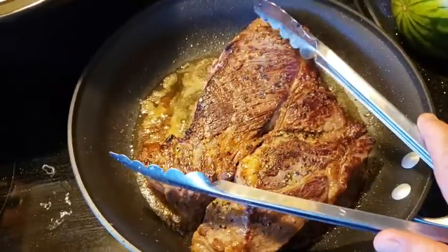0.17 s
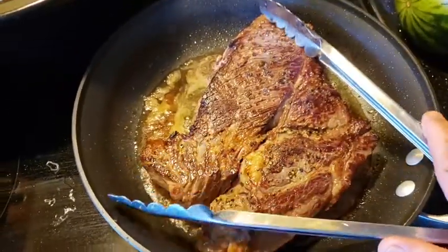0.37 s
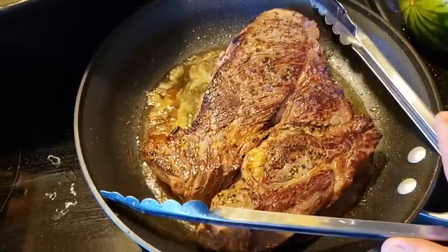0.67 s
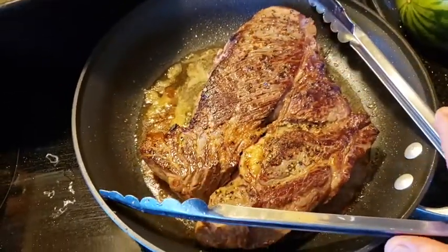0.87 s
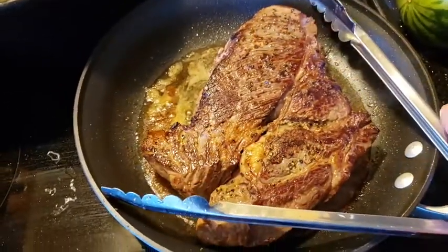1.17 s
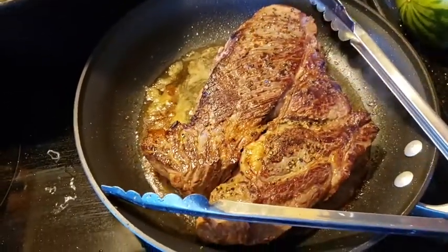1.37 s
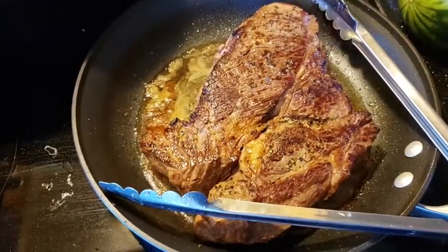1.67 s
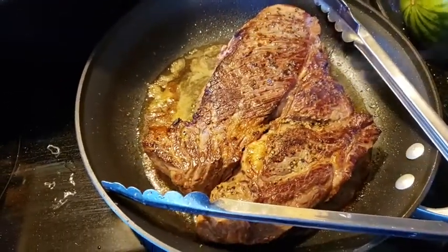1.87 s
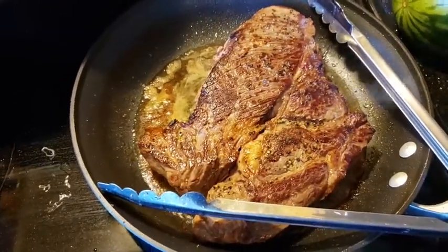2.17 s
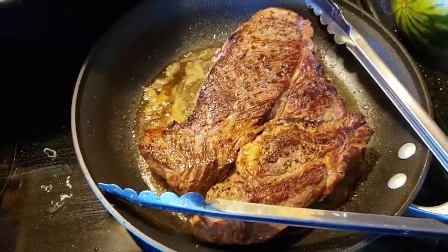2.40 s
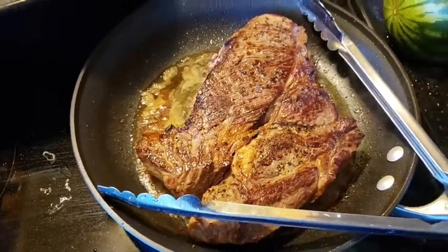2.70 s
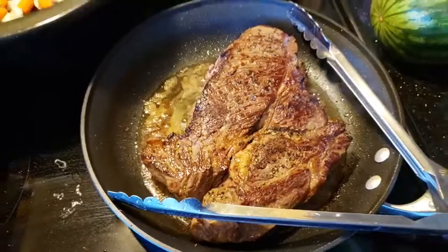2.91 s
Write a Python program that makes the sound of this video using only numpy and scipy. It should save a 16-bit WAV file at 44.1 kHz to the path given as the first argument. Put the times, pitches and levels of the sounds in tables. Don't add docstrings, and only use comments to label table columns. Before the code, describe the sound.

Meat sizzles steadily in hot fat in a pan, with sharp spits and a light tong clink

```python
import sys
import numpy as np
from scipy import signal
from scipy.io import wavfile

SR = 44100
rng = np.random.default_rng(int(sys.argv[2]) if len(sys.argv) > 2 else 0)


def digitize_waveform(pressure):
    field = np.atleast_2d(pressure).T
    bounded = np.clip(field, -1, 1)
    quanta = np.round(bounded * 32767).astype(np.int16)
    wavfile.write(sys.argv[1], SR, quanta)


def rack_gain(trim_db):
    fader = np.asarray(trim_db, float)
    return 10 ** (fader / 20)


N = 134505

# time_s, fizz_db (under the meat), spit_db (at the surface),
# brightness_db_per_octave, left_right_db
FRYING_HEAT = [(0, -30, -35, -5, -0.5), (.2, -31, -39.5, 0, -1), (.4, -31, -36, -5, -0.5),
               (.6, -31, -37.5, 1, -1), (.8, -30, -40, -1, -0.5), (1.0, -31, -36.5, 1.5, 0),
               (1.2, -31, -34, -1, -0.5), (1.33, -31, -34, 4, 0), (1.47, -30.5, -34.5, 3.5, -1),
               (1.6, -28, -35, 3, -2), (1.8, -29, -35.5, 5, -1), (2.0, -29, -35, -1, -1.5),
               (2.35, -29.5, -33.5, 3, -2), (2.55, -28.5, -36, 0.5, -2), (2.7, -29, -38, 0.5, -1),
               (2.87, -29.5, -39.5, -2.5, -2.5), (3.05, -30.5, -37, -4.5, -3)]
# pitch_hz, level_db_per_hz
FIZZ_COLOUR = [(1000, -24), (1400, -13), (2200, -0.5), (2800, -0.5), (3700, -9.5), (5300, -1), (6800, -6.5),
               (8500, -18)]
SPIT_COLOUR = [(7500, -3.5), (12000, 5), (15700, -4)]
TICK_COLOUR = [(2500, -10), (6000, -3.5), (13500, 3.5)]
STEAM_COLOUR = [(410, -93), (700, -31), (886, -10), (1440, 1.5), (2630, 7), (6070, -0.5), (8760, -1.5),
                (14800, 0), (16000, -12)]
# pitch_hz, level_db_per_hz
HUM_COLOUR = [(82, -35), (140, -15), (194, 9.5), (210, -20), (270, -37), (1100, 3), (1430, -35),
              (2420, -120)]
AIR_COLOUR = [(18, -34), (30, 7), (65, 2), (124, -1), (220, -13), (290, -50), (480, -120)]
# pitch_hz, likeness (1 same, 0 unrelated, -1 opposite)
PORT_LIKENESS = [(60, 0.3), (130, 0.44), (290, 0.98), (640, 1), (1410, 0.49), (3100, -0.39), (6820, 0.074),
                 (15000, 0.035)]
# middle_s, peak_db, pitch_hz
AIR_PUFFS = [(0.018, -33, 55), (.19, -32, 65), (.285, -23.5, 54.7), (.24, -40, 130), (.85, -39.5, 70),
             (1.16, -37, 62), (1.46, -41, 50), (1.56, -35, 60.4), (1.84, -36, 70), (1.9, -38, 60),
             (2.4, -40, 60), (2.695, -29, 70), (2.74, -34.5, 141), (2.91, -32.5, 75), (3.02, -33.5, 65)]
# start_s, peak_db, softness_db_per_octave
WORKTOP_KNOCKS = [
    (.0251, -26, -13),
    (.0335, -29, 0),
    (1.677, -33, -2),
    (2.055, -25, -3),
    (2.064, -30, -2),
    (2.907, -35, -9),
    (1.5405, -12, .1),
    (1.5435, -18, -3.5),
]
# pitch_hz, level_db, t60_s
WORKTOP_MODES = [(130, -12.5, 0.051), (285, -18, 0.071), (431, -21.5, 0.013), (609, -7.5, 0.017),
                 (776, -7.5, 0.017), (1056, -8.5, 0.019), (1220, -10, 0.02), (1490, -8, 0.023),
                 (1830, -9, 0.017), (2300, -29, 0.012), (3580, -40, .01)]
# start_s, peak_db, pitch_hz, left_right_db
DROPLET_SNAPS = [(.0252, -6, 7500, 2), (.0268, -14, 11500, 0), (.0314, -13, 12000, 0),
                 (.0323, -10, 6000, -1), (.0334, -6, 7000, 0), (.0336, -2.5, 13000, -1),
                 (.0347, -10, 13500, -1), (.036, -12, 7500, 0), (.0477, -16, 12000, -1),
                 (.0491, -12, 12700, -2), (.052, -16, 12500, 0), (.6234, -10, 12000, -2),
                 (.6305, -17, 11000, 0), (.6325, -12, 13000, -1), (.635, -17, 12000, -2),
                 (.638, -19, 13000, 0), (.868, -17, 9000, 0), (.875, -14, 9500, 0), (.966, -18, 12400, 2),
                 (1.261, -17, 15000, 2), (1.4428, -10, 12000, 6), (1.4481, -2, 14000, 5),
                 (1.455, -15, 14500, 2), (2.9074, -15, 5000, -2), (2.967, -18, 13900, -4)]
# start_s, peak_db, pitch_hz, left_right_db
BIG_POPS = [(0.519, -25, 2100, 4), (0.9817, -22, 3080, 1.0), (0.9953, -20, 2330, 1.5),
            (1.5047, -19, 2650, 5), (1.6225, -25, 2780, 1.0), (1.7242, -25, 2320, 12),
            (1.807, -17.5, 2570, 3.5), (1.836, -23, 2240, 0), (1.87, -25.5, 1880, -1),
            (1.9015, -21, 2740, -0.5), (2.0514, -23, 2890, -1.0), (2.119, -22, 2090, -12),
            (2.3747, -19, 2400, -9), (2.4095, -20, 2580, -7), (2.467, -23, 2280, -14),
            (2.5441, -19.5, 2950, 3.5), (2.5524, -17, 3030, 2), (2.6654, -16.5, 2460, -2.5),
            (2.692, -19.5, 2350, -8), (2.7459, -24, 2100, -7), (2.8382, -15.5, 2730, -8),
            (2.8848, -17.5, 2140, -18), (2.907, -16.5, 2730, -11), (2.9117, -15.5, 2360, -2),
            (2.9375, -24, 2370, -2.0), (2.9672, -21.5, 2460, 1), (3.0103, -19, 2830, 1)]
SMALL_POPS = [(0.2239, -18.5, 5400, 1.0), (0.523, -21, 4050, -1), (0.663, -14.5, 5910, -2),
              (0.856, -14, 7410, 5), (1.2014, -14.5, 5050, -1), (1.5429, -18, 6470, 1),
              (1.7399, -16, 5780, 1), (1.9085, -19, 5130, 6.0), (2.0427, -17, 6340, -1),
              (2.5745, -32, 5480, 1), (2.575, -15, 5080, -6), (2.6319, -15, 5670, -2),
              (2.7364, -17, 5970, 4.5)]
# start_s, peak_db, softness_db_per_octave
TONG_TOUCHES = [
    (.3656, -17, 2),
    (.3667, -14, 3.5),
    (.3693, -19, 2.5),
    (.3745, -14.5, 2.5),
    (.3795, -19, 4),
    (.384, -22, 2),
    (.389, -24.5, 6),
    (.394, -26, 3),
    (.402, -24, 4),
]
# pitch_hz, level_db, t60_s
TONG_MODES = [(118.6, -12.5, 0.077), (290, -25, 0.11), (587, -17.5, 0.038), (1155, -9.5, 0.029),
              (1408, -6.5, 0.046), (1546, -8, 0.031), (2040, -9.5, 0.035), (2650, -7.5, 0.033),
              (3200, -6, 0.028), (3950, -7, 0.016), (4710, 0, 0.022), (5440, -2, 0.025), (7190, -1, 0.014),
              (9200, -4.5, 0.011)]
# time_s, level_db
RIM_SLIDE = [
    (.59, -75),
    (.61, -42),
    (.635, -41.5),
    (.652, -37.5),
    (.67, -45),
    (.7, -55),
    (.72, -79),
]
# pitch_hz, width_hz, share
LEFT_PORT = [(5790, 5360, 0.76), (9340, 3900, -0.36)]


def rms_one(x):
    return x / np.sqrt(np.mean(x ** 2) + 1e-20)


def in_time(rows):
    times_s, *columns = np.transpose(rows)
    return [np.interp(np.arange(N) / SR, times_s, column) for column in columns]


def at_hz(colour, hz):
    points_hz, values = np.transpose(colour)
    return np.interp(np.log(hz), np.log(points_hz), values)


def drift(rate_hz):
    pull = np.exp(-80 * np.pi * rate_hz / SR)
    warm_up = 2000
    noise = rng.standard_normal(N // 40 + 2 + warm_up)
    slow = rms_one(signal.lfilter([1], [1, -2 * pull, pull * pull], noise)[warm_up:])
    return np.interp(np.arange(N) / 40, np.arange(len(slow)), slow)


def ring(clicks, hz, t60_s):
    decay = rack_gain(-60 / (t60_s * SR))
    turn = 2 * np.pi * min(hz, .45 * SR) / SR
    return signal.lfilter([0, np.sin(turn)], [1, -2 * decay * np.cos(turn), decay * decay], clicks + 1e-18)


def at_ports(start_s, size, lag_s, pan_db):
    out = np.zeros((2, N + 64))
    arrivals = (start_s * SR + 0 * lag_s, (start_s + lag_s) * SR)
    gains = (rack_gain(pan_db / 2), rack_gain(-pan_db / 2))
    for port, arrival, gain in zip(out, arrivals, gains):
        i = np.clip(arrival, 0, N).astype(int)
        part = arrival % 1
        np.add.at(port, i, size * gain * (1 - part))
        np.add.at(port, i + 1, size * gain * part)
    return out[:, :N]


def bursts(colour, per_s, cycles, spread_db, clump_db, tilt_db=0, count=18):
    out = 0
    shared_clumps = clump_db * drift(22)
    for hz in np.geomspace(colour[0][0], colour[-1][0], count):
        chance = per_s / count / SR * rack_gain(shared_clumps + clump_db * drift(20))
        start_s = np.flatnonzero(rng.random(N) < chance) / SR
        push, lag, pan = rng.standard_normal((3, len(start_s)))
        bigness = np.minimum(rng.exponential(1, len(start_s)), 2.8)
        size = rack_gain(spread_db * bigness) * np.sign(push)
        clicks = at_ports(start_s, size, lag_s=.00013 + .00008 * lag, pan_db=7.5 * pan)
        band = rms_one(ring(clicks, hz, cycles / hz))
        level = rack_gain(at_hz(colour, hz) + tilt_db * np.log2(hz / 3500))
        out = out + level * np.sqrt(hz) * band
    return rms_one(out)


def banded_noise(colour, patchy_db, fast_db):
    low_hz, high_hz = colour[0][0], min(colour[-1][0], .45 * SR)
    edges = np.geomspace(low_hz, high_hz, 2 + int(3 * np.log2(high_hz / low_hz)))
    out = 0
    together = drift(16)
    white = rng.standard_normal((2, 2, N))
    for k, (low, high) in enumerate(zip(edges, edges[1:])):
        band = signal.butter(2, [low, high], "band", fs=SR, output="sos")
        mid, side = signal.sosfilt(band, white[k % 2])
        hz = np.sqrt(low * high)
        alike = np.clip(at_hz(PORT_LIKENESS, hz), -1, 1)
        gain = rack_gain(at_hz(colour, hz) + patchy_db * together + fast_db * drift(37))
        out = out + gain * (np.sqrt(1 + alike) * mid + np.sqrt(1 - alike) * side * [[1], [-1]])
    return rms_one(out)


def frying():
    fizz_db, spit_db, bright_db, pan_db = in_time(FRYING_HEAT)
    fizz = bursts(FIZZ_COLOUR, per_s=6000, cycles=34, spread_db=4, clump_db=2, tilt_db=bright_db)
    spit = bursts(SPIT_COLOUR, per_s=4000, cycles=26, spread_db=4, clump_db=3.5, count=8)
    ticks = bursts(TICK_COLOUR, per_s=1200, cycles=2.5, spread_db=4, clump_db=4, count=4)
    steam = banded_noise(STEAM_COLOUR, patchy_db=0.98, fast_db=1.8)
    steam_db = -29 + .3 * (spit_db - spit_db.mean()) + 1.2 * (fizz_db - fizz_db.mean())
    pan = rack_gain(fizz_db - 5.5) * fizz + rack_gain(spit_db) * spit
    pan = pan + rack_gain((spit_db + fizz_db) / 2 - 10.5) * ticks + rack_gain(steam_db) * steam
    return pan * rack_gain([pan_db / 2, -pan_db / 2])


def hum():
    return rack_gain(-63) * banded_noise(HUM_COLOUR, patchy_db=2, fast_db=1.5)


def air():
    return rack_gain(-46.5) * banded_noise(AIR_COLOUR, patchy_db=1, fast_db=1.5)


def puffs():
    t = np.arange(N) / SR
    width_s = .014
    out = np.zeros((2, N))
    for middle_s, db, hz in AIR_PUFFS:
        turn, side = rng.random(2)
        phase = 2 * np.pi * turn + np.pi / 4 * np.sign(side - .5) * np.array([[1], [-1]])
        swell = np.exp(-.5 * ((t - middle_s) / width_s) ** 2)
        out += rack_gain(db) * swell * np.sin(2 * np.pi * hz * t + phase)
    return out


def struck(hits, modes, lag_s, sign=1):
    start_s, db, soft_db = np.transpose(hits)
    vary_db = 1.5
    draw = rng.standard_normal((len(start_s), len(modes), 2))
    t = np.arange(1500) / SR
    rattle_db, rattle_t60_s = -11, .035
    out = 0
    for k, (hz, level_db, t60_s) in enumerate(modes):
        rattle = rng.standard_normal(len(t)) * rack_gain(rattle_db - 60 * t / rattle_t60_s)
        contact = rattle * np.sqrt(hz / SR) + (t == 0)
        softness_db = soft_db * np.log2(max(hz / 1000, 1))
        size = rack_gain(db + level_db - softness_db + vary_db * draw[:, k, 0])
        clicks = at_ports(start_s, size, lag_s, vary_db * draw[:, k, 1])
        force = signal.oaconvolve(clicks, contact[None], axes=1)[:, :N]
        out = out + sign ** k * ring(force, hz, t60_s)
    return signal.sosfilt(signal.butter(3, 110, "high", fs=SR, output="sos"), out)


def knocks():
    return struck(WORKTOP_KNOCKS, WORKTOP_MODES, lag_s=.00008)


def snaps():
    out = np.zeros((2, N + SR))
    t = np.arange(2000) / SR
    click = 1. * (t == 0)
    cycles, lag_s = 9, .00007
    spray_db, spray_t60_s = -20, .05
    for start_s, db, hz, pan_db in DROPLET_SNAPS:
        crack = ring(click, hz, cycles / hz) - .5 * ring(click, .55 * hz, cycles / hz)
        crack = crack / np.abs(crack).max()
        bright_noise = np.diff(rng.standard_normal((2, len(t) + 1)))
        spray = bright_noise * rack_gain(spray_db - 60 * t / spray_t60_s)
        for port in (0, 1):
            i = int((start_s + port * lag_s) * SR)
            out[port, i:i + len(t)] += rack_gain(db + pan_db * (.5 - port)) * (crack + spray[port])
    return out[:, :N]


def kitchen(near):
    t = np.arange(SR // 3) / SR
    t60_s, echo_db = .25, -20
    tail = rng.standard_normal((2, len(t))) * rack_gain(-60 * t / t60_s) * (t > .004)
    tail = signal.lfilter([.5], [1, -.5], tail)
    tail = tail / np.sqrt(np.sum(tail ** 2) / 2)
    return rack_gain(echo_db) * signal.fftconvolve(near, tail, axes=1)[:, :N]


def pops():
    out = np.zeros((2, N))
    cycles = 14
    for start_s, db, hz, pan_db in BIG_POPS + SMALL_POPS:
        size = rack_gain(db + 1 - np.log2(hz / 2400))
        click = at_ports(np.array([start_s]), size, .00005, np.clip(pan_db, -5, 5))
        i = slice(int(start_s * SR), int((start_s + .03) * SR))
        pop = ring(ring(click[:, i], hz, cycles / hz), hz * 0.975, cycles / hz)
        out[:, i] += pop * np.abs(click).max() / np.abs(pop).max()
    return out


def tongs():
    return struck(TONG_TOUCHES, TONG_MODES, lag_s=.0001, sign=-1)


def slide():
    noise = rng.standard_normal((2, N))
    thud = rms_one(ring(noise[0], 158, .03))
    rub_hz = 1100
    rub_band = signal.butter(1, [rub_hz / 4, rub_hz * 2.3], "band", fs=SR, output="sos")
    rub = rms_one(signal.sosfilt(rub_band, noise[1]))
    return rack_gain(in_time(RIM_SLIDE)[0]) * (thud + rack_gain(1) * rub)


def scene():
    near = knocks() + snaps() + pops() + tongs() + slide()
    return frying() + hum() + air() + puffs() + near + kitchen(near)


def top_cut(x):
    return signal.sosfilt(signal.butter(12, 16250, fs=SR, output="sos"), x)


def record(dry):
    left, right = dry
    coloured = left
    for hz, width_hz, share in LEFT_PORT:
        coloured = coloured + share * signal.lfilter(*signal.iirpeak(hz, hz / width_hz, fs=SR), left)
    low_cut = signal.butter(3, 38, "high", fs=SR, output="sos")
    high_cut = signal.ellip(14, .3, 95, 16050 * .99, fs=SR, output="sos")
    mix = signal.sosfilt(high_cut, signal.sosfilt(low_cut, [coloured, right]))
    return top_cut(mix)


dry = scene()
out = record(dry)
digitize_waveform(out)
```